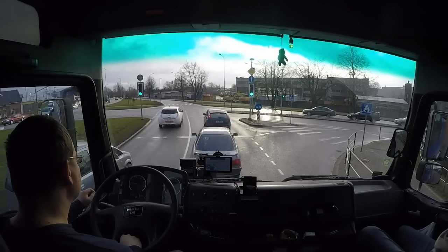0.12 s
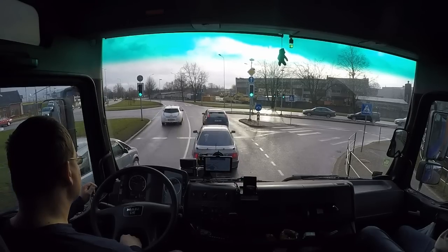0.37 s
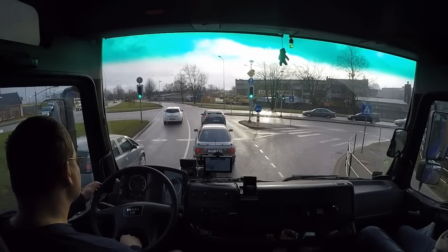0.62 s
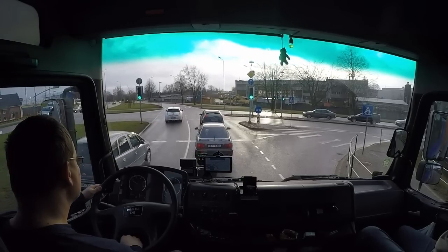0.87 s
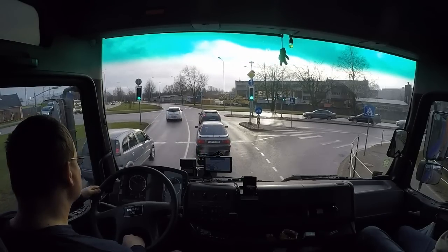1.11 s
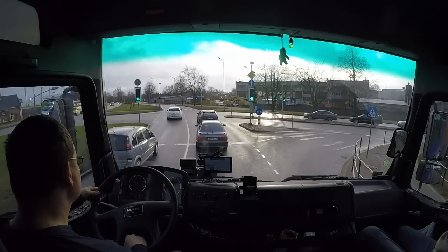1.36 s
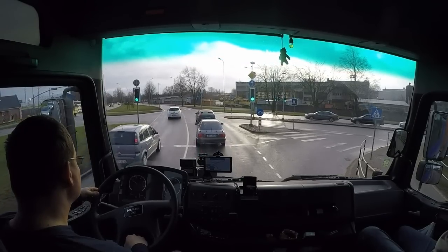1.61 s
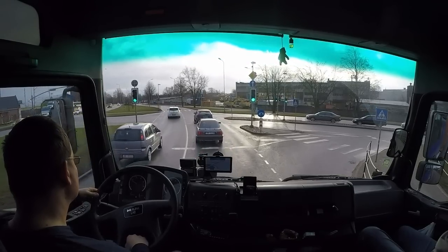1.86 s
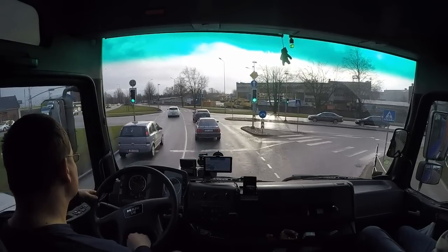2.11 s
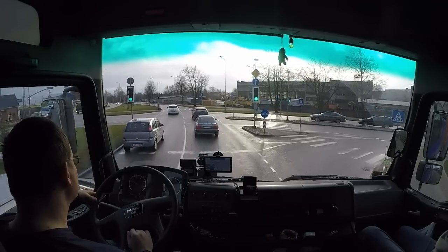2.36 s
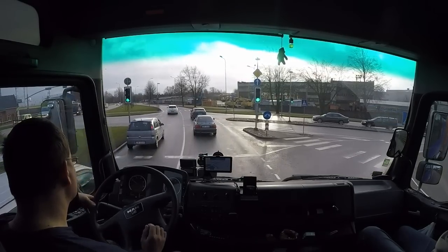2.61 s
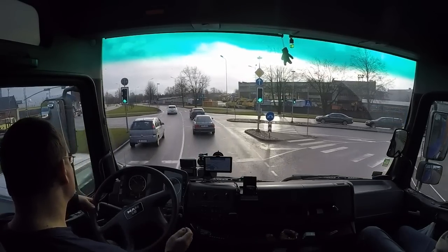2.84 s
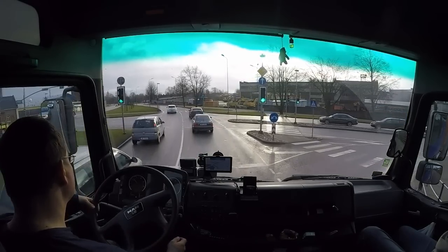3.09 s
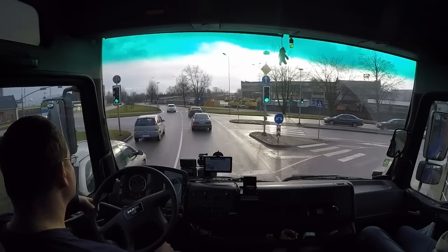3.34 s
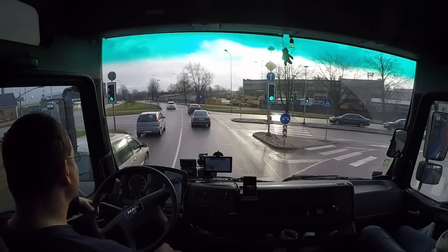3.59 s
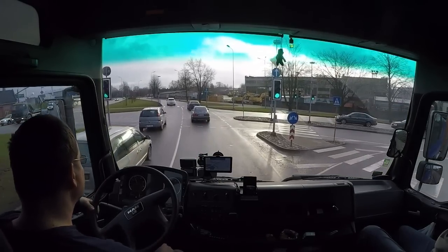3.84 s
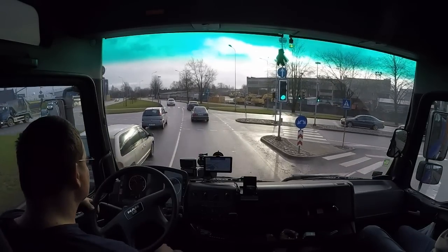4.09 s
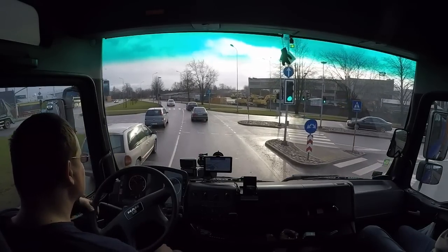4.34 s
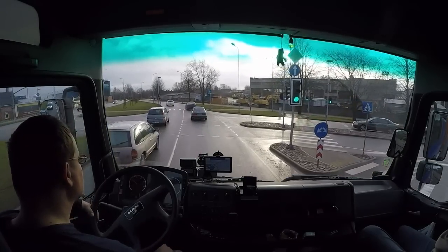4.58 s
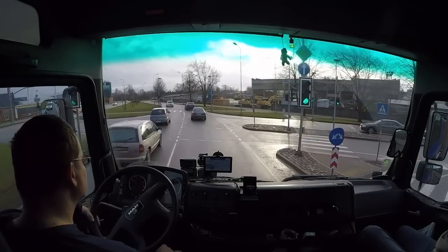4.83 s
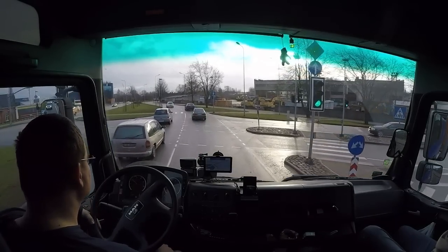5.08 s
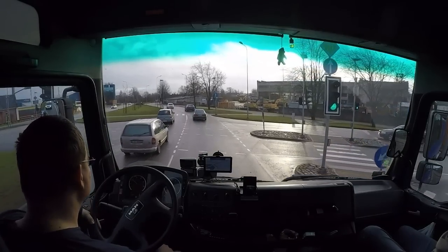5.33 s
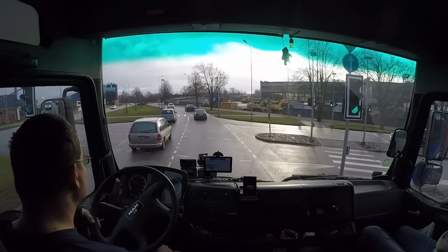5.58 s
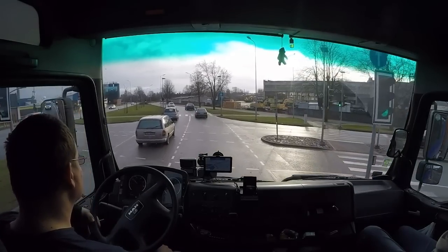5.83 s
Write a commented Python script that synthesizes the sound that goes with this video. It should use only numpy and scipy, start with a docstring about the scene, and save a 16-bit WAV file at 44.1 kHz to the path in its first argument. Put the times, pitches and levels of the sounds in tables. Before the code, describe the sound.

Inside a truck cab, a six-cylinder diesel rises from a low throbbing boom as the truck pulls away, sags near two seconds, then climbs strongly. The pedal lifts, the engine note falls with a small air puff, and power returns in the next gear. Faint turbo whistle, gear whine, trim ticks and deep body rumble; close, muffled interior microphone.

```python
"""Inside the cab of a six-cylinder diesel truck that pulls away and shifts gear twice.
The firing rate booms as a tone with cab-filtered overtones; combustion roar is noise shaped by load.
Timing gears whine at multiples of the firing rate, the turbo whistles, two panels drone at fixed pitch.
The body rumbles under gliding low tones (driveline shudders and one hum), trim ticks, the treble fizzes.
Noise bursts puff like air valves; two narrow late ones are breath on the falling turbo whistle."""
import sys
import numpy as np
from scipy import signal
from scipy.io import wavfile
from scipy.ndimage import uniform_filter1d

SR = 44100
rng = np.random.default_rng(int(sys.argv[2]) if len(sys.argv) > 2 else 0)


def unload_wav(signal):
    """Save mono or channel-first audio to the path in sys.argv[1] as 16-bit WAV at rate SR, clipped to [-1, 1]."""
    wavfile.write(
        sys.argv[1],
        SR,
        np.round(np.clip(np.atleast_2d(signal).T, -1, 1) * 32767).astype(np.int16),
    )


def ratio_of_db(decibels):
    """Turn decibels (scalar or array-like) into linear amplitude factors; 0 dB maps to 1."""
    return 10 ** (np.asarray(decibels, float) / 20)


N = 262395

# engine run: t/s, firing rate f/Hz, load/dB
ENGINE = [(0, 29.37, -6), (.12, 30.83, -6), (.25, 35.18, -5.5), (0.429, 41.8, -6), (.52, 43.77, -5.5),
          (0.618, 44.83, -6.5), (0.852, 46.33, -5.5), (1.151, 47.75, -5.5), (1.51, 46.18, -4.5),
          (1.799, 42.51, -5), (2.152, 35.75, -4.5), (2.3, 40.87, -4), (2.449, 46.9, -4.5),
          (2.65, 50.23, -3.5), (2.853, 55.28, -3), (3.05, 60.07, -3), (3.301, 65.32, -2), (3.55, 69.3, -3),
          (3.801, 68, -4), (4.302, 52.45, -5), (4.55, 47.47, -5.5), (4.75, 45.23, -4.5),
          (4.95, 46.47, -3.5), (5.45, 52.04, -2.7), (5.7, 54.3, -2), (5.95, 56.76, -1.5)]
# pedal lifted for a shift: lift t/s, fuel back t/s
LIFTS = [(3.7, 4.66), (5.8, 6.6)]


def evened(x):
    """Scales to rms 1."""
    return x / np.sqrt(np.mean(x ** 2) + 1e-20)


def read(points, hz):
    """Reads a table against frequency on a log-frequency axis."""
    f, value = np.transpose(points)
    return np.interp(np.log(hz + 1), np.log(f + 1), value)


def curves(rows):
    """Every column of a table after its time column, sample by sample."""
    s, *columns = np.transpose(rows)
    return [np.interp(np.arange(N) / SR, s, c) for c in columns]


def wander(rate_hz):
    """Slow random drift of rms 1: low-passed noise, filter settled for 1 s."""
    low_pass = signal.butter(2, rate_hz, fs=SR)
    return evened(signal.lfilter(*low_pass, rng.standard_normal(N + SR))[SR:])


def noise(field_db, size):
    """Noise of rms 1 from random short-time spectra; field_db(bin Hz, frame s) shapes it."""
    hop = size // 4
    hz = np.fft.rfftfreq(size, 1 / SR)[:, None]
    s = np.arange(N // hop + 5) * hop / SR
    a, b = rng.standard_normal((len(s), len(hz), 2)).T
    z = (a + 1j * b) * ratio_of_db(field_db(hz, s))
    return evened(signal.istft(z, nperseg=size, noverlap=size - hop)[1][:N])


def whine(hz, level_db, width_hz, clean):
    """A thin tone: a steady share plus a narrow band of noise around the same pitch."""
    breath = (wander(width_hz / 2) + 1j * wander(width_hz / 2)) / np.sqrt(2)
    carrier = np.exp(2j * np.pi * np.cumsum(hz) / SR)
    tone = carrier * (clean + np.sqrt(1 - clean ** 2) * breath)
    return np.sqrt(2) * ratio_of_db(level_db) * tone.real


def fuel_cut_db():
    """The boom sinks after each pedal lift; returning fuel jumps, then builds up."""
    lift_s, bite_s, press_s = 0.39, .04, 0.38
    cut_db, bite_db = -14.5, -4.5
    levels_db = [0, cut_db, cut_db, bite_db, 0]
    s = np.arange(N) / SR
    return sum(np.interp(s, [lift, lift + lift_s, back, back + bite_s, back + press_s], levels_db)
               for lift, back in LIFTS)


def firing(hz, turns, load_db, cut_db):
    """The firing rate as a clean boom; its overtones swell as they cross the cab's resonances."""
    # boom at the firing rate before load and fuel cut: f/Hz, level/dB
    boom_by_rate = [(30, -9.5), (34, -11.5), (38, -9.5), (44, -11.5), (47, -11.5), (50, -13), (55, -13.5),
                    (60, -18), (64, -21.5), (69, -23)]
    # clutch judder dips the boom: t/s, depth/dB
    judder_dips = [(.278, -6.5), (.385, -4.5), (.58, -5), (.675, -4), (3.14, -6), (4.83, -5)]
    # overtones of the firing pulse: multiple of firing rate, relative level/dB, phase/turns
    orders = [(2, 0, 0), (3, -5, .12), (4, -11, .2), (5, -10, .6), (6, -11, .4), (7, -16, .8)]
    # cab response to engine tones: f/Hz, gain/dB
    cab_response = [(60, -27), (75, -31), (88, -32), (95, -32.5), (110, -29), (122, -32), (135, -32),
                    (148, -32), (158, -28), (165, -27.5), (173, -41), (185, -43), (200, -44), (212, -38.5),
                    (222, -37.5), (235, -32), (250, -40), (285, -41), (310, -47), (340, -39), (370, -42),
                    (450, -48)]
    dip_s = .018
    dips_db = sum(db * np.exp(-((np.arange(N) / SR - s) / dip_s) ** 2 / 2) for s, db in judder_dips)
    boom_db = read(boom_by_rate, hz) + 0.48 * load_db + cut_db
    out = ratio_of_db(boom_db + dips_db + 0.72 * wander(rate_hz=7.8)) * np.cos(2 * np.pi * turns)

    # harder combustion sharpens the pulse; overtones sink while the engine slows (Hz/s, over 0.2 s)
    slowing = np.minimum(uniform_filter1d(np.gradient(hz) * SR, SR // 5), 0)
    sharp_db = 2 + 1.14 * load_db + 0.072 * slowing
    for k, db, phase in orders:
        push_db = sharp_db if k > 3 else .5 * sharp_db
        push_db = push_db + .35 * cut_db * (k <= 4)
        uneven_db = wander(rate_hz=5)  # cylinders never fire quite alike
        level_db = db + read(cab_response, k * hz) + push_db + uneven_db
        out += ratio_of_db(level_db) * np.cos(2 * np.pi * (k * turns + phase))
    return np.sqrt(2) * out


def roar():
    """Combustion roar through the bulkhead, coloured by the panels and rising with load."""
    # roar spectrum before panels and load: f/Hz, relative density/dB per Hz
    roar_colour = [(60, -14), (90, -6.5), (125, -6), (155, -6), (191, -13), (301, -17), (445, -18),
                   (877, -20.5), (1400, -27.5), (1580, -34), (1750, -37.5), (2050, -38.5), (2500, -43),
                   (4840, -55), (6460, -59.5), (12000, -64), (15000, -88.5)]
    # panels and air spaces of the cab: f/Hz, width/Hz, gain/dB
    resonances = [(113, 26, -1), (225, 75, 2.5), (343, 84, 4.5), (3270, 390, 3.5), (4980, 1800, 7)]
    # how far each part of the roar follows the load: f/Hz, dB per dB of load
    load_share = [(70, 0.026), (200, 1.23), (300, 1.71), (450, 1.73), (1000, 1.81), (1900, 1.83),
                  (3300, 1.6), (12000, 0.3)]
    roar_db = -33
    streaks_db, streaks_to_hz = 2, 2000
    s_rows, _, load_db = np.transpose(ENGINE)

    def field_db(hz, s):
        panels_db = sum(db / (1 + (2 * (hz - f) / w) ** 2) for f, w, db in resonances)
        # narrow, short-lived swells, weaker towards the treble
        streaks = uniform_filter1d(rng.standard_normal((len(s), len(hz))), size=7, axis=0)
        streaks = evened(uniform_filter1d(streaks, size=3, axis=1)).T
        swells_db = streaks_db / (1 + (hz / streaks_to_hz) ** 2) * streaks
        push_db = read(load_share, hz) * np.interp(s, s_rows, load_db)
        return read(roar_colour, hz) + panels_db + swells_db + push_db
    return ratio_of_db(roar_db) * noise(field_db, size=4096)


def rumble():
    """Loose low shaking of the body, and gliding low tones: driveline shudders and one hum."""
    # body rumble spectrum: f/Hz, relative density/dB per Hz
    rumble_colour = [(10, -25), (18, 18.5), (26, 32), (36, 14.5), (50, 26), (65, 24), (85, 6), (130, -68.5)]
    # driveline shudders, and at 4.04 s a hum at twice the falling firing rate:
    # t/s, length/s, first f/Hz, last f/Hz, mid level/dB
    low_glides = [(0.209, 0.84, 26.05, 38.1, -30), (2.751, 0.31, 28.6, 23.7, -19),
                  (3.616, 0.35, 32.68, 36.5, -23), (3.815, 0.26, 40.1, 61, -26),
                  (4.044, 0.4025, 114.1, 99.66, -36), (4.419, 0.32, 37.46, 25.54, -19),
                  (5.497, 0.32, 24, 29.65, -35)]
    level_db = -30 + 0.3 * np.arange(N) / SR  # rises steadily throughout
    out = ratio_of_db(level_db) * noise(lambda hz, s: read(rumble_colour, hz) + 0 * s, size=8192)
    for s, length_s, first_hz, last_hz, db in low_glides:
        part = out[round(s * SR):][:round(length_s * SR)]
        hz = np.linspace(first_hz, last_hz, len(part))
        glide = np.sin(2 * np.pi * np.cumsum(hz) / SR)
        part += np.sqrt(2) * ratio_of_db(db) * np.hanning(len(part)) * glide
    return out


def gears(hz, load_db, cut_db):
    """Timing gears whine at their tooth-meshing rates, locked to the firing rate."""
    # meshing gears: teeth per firing, level/dB before colour, load and fuel cut
    meshes = [(41 / 3, -60), (43 / 3, -51.5), (46 / 3, -59), (35 / 3, -63)]
    # cab response to gear tones: f/Hz, gain/dB
    gear_colour = [(420, 2), (490, 5), (560, -4), (630, -1), (680, 1.5), (780, 0), (850, 1), (960, 0)]
    out = np.zeros(N)
    for k, db in meshes:
        level_db = db + read(gear_colour, k * hz) + .25 * load_db + .2 * cut_db
        out += whine(k * hz, level_db + 1.7 * wander(rate_hz=5), width_hz=40, clean=.8)
    return out


def turbo():
    """A thin whistle once the wheel spins fast, and a breathy tone above it."""
    # t/s, whistle f/Hz, breathy upper tone level/dB
    spin = [(0, 1900, -92), (1.1, 2680, -80), (1.5, 3060, -76), (1.9, 3380, -79), (2.4, 3500, -92),
            (2.95, 4250, -89), (3.2, 4650, -83), (3.42, 5150, -79.5), (3.56, 5330, -83), (3.68, 5270, -90),
            (3.8, 5070, -95), (4.1, 4620, -95), (4.8, 3630, -95), (5.35, 4150, -87), (5.62, 4590, -81),
            (5.95, 5150, -78)]
    upper_ratio = 1.56
    full_from_hz, fade_db_per_hz = 4540, .05
    hz, upper_db = curves(spin)
    fade_db = fade_db_per_hz * np.minimum(hz - full_from_hz, 0)
    # rises steadily throughout, passing 0 dB at the first listed pedal lift
    gain_db = 1.5 * (np.arange(N) / SR - LIFTS[0][0])
    level_db = -73.2 + fade_db + gain_db + wander(rate_hz=15)
    upper = whine(upper_ratio * hz, upper_db, width_hz=320, clean=0)
    return upper + whine(hz, level_db, width_hz=200, clean=.9)


def panels(hz, load_db):
    """Two lightly damped panels drone, louder when an overtone comes near their pitch."""
    # one panel each: f/Hz, level/dB before load, rise and lift, overtone, lift/dB, reach/Hz
    floor_panel = (161, -49.5, 3, 4, 9)
    dash_panel = (345, -58, 6, 8, 18)
    # both follow the load and rise steadily throughout
    growth_db = 1.6 * load_db + 1.4 * np.arange(N) / SR

    def drone(panel, width_hz, clean):
        own_hz, db, k, lift_db, reach_hz = panel
        near_db = lift_db / (1 + ((k * hz - own_hz) / reach_hz) ** 2)
        return whine(np.full(N, 1. * own_hz), db + growth_db + near_db, width_hz, clean)
    return drone(floor_panel, 5, .7) + drone(dash_panel, 24, .2)


def air_bursts():
    """Short noise bursts: most puff like air valves, two narrow late ones are turbo breath."""
    # the two late ones, 500 Hz wide, lie on the falling turbo whistle:
    # t/s, level/dB, length/s, centre f/Hz, width/Hz
    bursts = [(.788, -62, .02, 3000, 3000), (1.93, -66, .03, 4800, 3000), (2.93, -68, .03, 4600, 700),
              (5.05, -65, .04, 3800, 3000), (3.843, -65, .012, 8000, 3000), (3.845, -55, .022, 4000, 3200),
              (3.86, -68, .15, 4800, 1800), (3.93, -74, .12, 9000, 7000), (3.925, -68, .08, 4750, 500),
              (4.04, -71, .05, 4650, 500)]
    out = np.zeros(N)
    for s, db, length_s, hz, width_hz in bursts:
        u = np.linspace(0, 2, round(2 * length_s * SR))  # time in burst lengths
        band_hz = np.clip([hz - width_hz / 2, hz + width_hz / 2], 100, 20000)
        band_pass = signal.butter(2, band_hz, "bandpass", fs=SR)
        air = signal.lfilter(*band_pass, rng.standard_normal(4 * SR // 10))[-len(u):]
        envelope = np.minimum(u / 0.1, 1) * np.exp(-2.5 * u ** 15.0)
        out[round(s * SR):][:len(u)] += ratio_of_db(db) * evened(air) * envelope
    return out


def ticks():
    """Dry ticks of plastic trim, two close modes each: a few clear ones and a scatter of faint ones."""
    # clear ticks: t/s, level/dB, f/Hz
    clear = [(.642, -58, 3200), (.663, -58, 3100), (.788, -52, 3950), (.789, -50, 1750), (.798, -59, 4000),
             (.832, -58, 3500), (.843, -57, 2800), (.873, -59, 3800), (.878, -60, 3200), (.934, -54, 4800),
             (.952, -57, 4800), (1.93, -55, 4800), (1.95, -56, 4000), (2.93, -55, 4700), (3.963, -50, 3200),
             (3.985, -57, 4700), (5.06, -56, 3800)]
    # pitches of the faint ticks: f/Hz
    trim_hz = [3150, 3350, 3950, 4800]
    peak_s, faint_per_s, faintest_db = .0012, 9, -67
    chance = rng.random((round(faint_per_s * N / SR), 3))
    faint = [(a * N / SR, faintest_db + 6 * b, trim_hz[int(c * len(trim_hz))]) for a, b, c in chance]
    out, t = np.zeros(N), np.arange(0, 12 * peak_s, 1 / SR)
    envelope = t / peak_s * np.exp(1 - t / peak_s)
    for s, db, hz in clear + faint:
        modes = np.sin(2 * np.pi * hz * t) + .4 * np.sin(2 * np.pi * .88 * hz * t)
        ping = ratio_of_db(db) * envelope * (modes + .2 * rng.standard_normal(len(t)))
        part = out[round(s * SR):][:len(t)]
        part += ping[:len(part)]
    return out


def fizz(hz, turns, cut_db):
    """Treble fizz that flares twice in every firing and sinks with the boom when fuel is cut."""
    # f/Hz, relative density/dB per Hz
    fizz_colour = [(3000, -25), (5500, -6), (7000, -4), (10000, -11), (12500, -9.5), (14000, -15),
                   (16000, -38.5)]
    # firing rate f/Hz, level/dB before fuel cut and flares
    fizz_by_rate = [(30, -67), (34, -72.5), (38, -72), (44, -78), (48, -83), (53, -77.5), (57, -86),
                    (68, -89)]
    flare_db = 1.1 * np.cos(2 * np.pi * (2 * turns - .25)) + 1.5 * wander(rate_hz=23)
    level_db = read(fizz_by_rate, hz) + 0.72 * cut_db
    return ratio_of_db(level_db + flare_db) * noise(lambda hz, s: read(fizz_colour, hz) + 0 * s, size=512)


def scene():
    """All sources at one microphone."""
    hz, load_db = curves(ENGINE)
    turns = np.cumsum(hz) / SR + 0.3076  # firing phase
    cut_db = fuel_cut_db()
    engine = firing(hz, turns, load_db, cut_db) + roar() + gears(hz, load_db, cut_db) + turbo()
    cab = panels(hz, load_db) + rumble() + air_bursts() + ticks() + fizz(hz, turns, cut_db)
    return (engine + cab)[None]


def band_limit(x):
    """A steep low-pass at the top of the band."""
    return signal.sosfilt(signal.butter(12, 15260, fs=SR, output="sos"), x)


def record(dry):
    """Fades in from silence, and out to a quarter, within a few milliseconds."""
    n = np.arange(N)
    fade_in = np.minimum(n / 300, 1)
    fade_out = np.minimum(n[::-1] / 300 + 0.25, 1)
    return band_limit(dry * fade_in * fade_out)


dry = scene()
out = record(dry)
unload_wav(out)
```